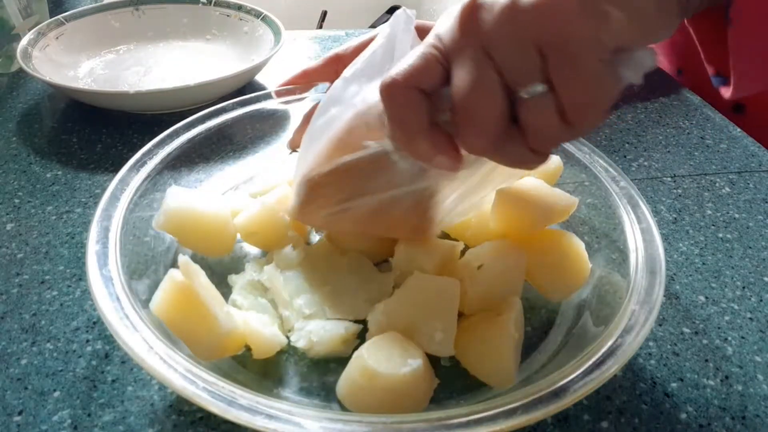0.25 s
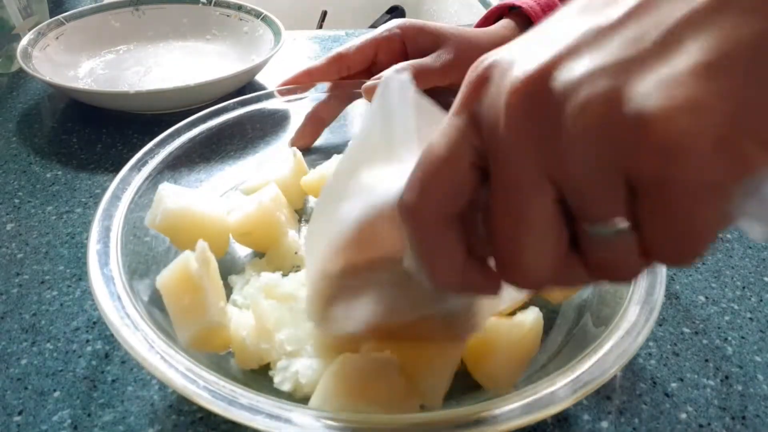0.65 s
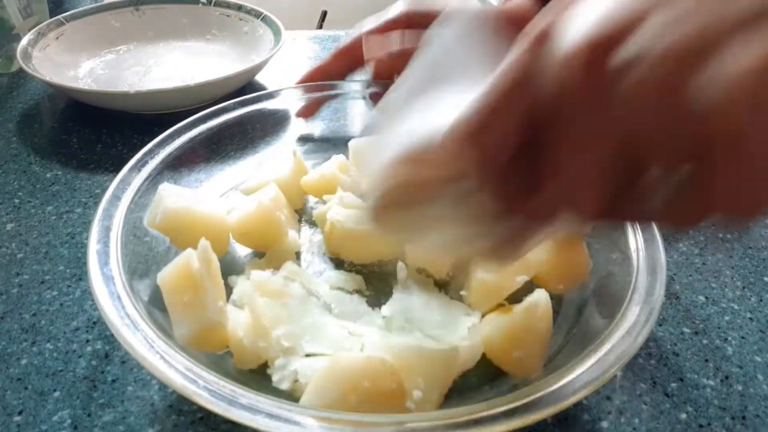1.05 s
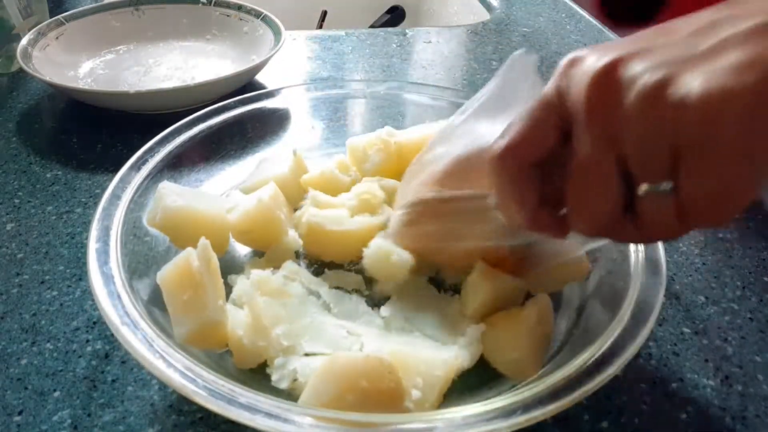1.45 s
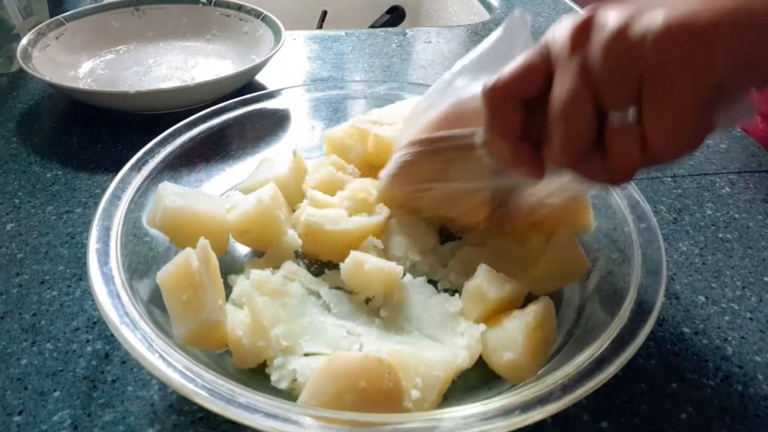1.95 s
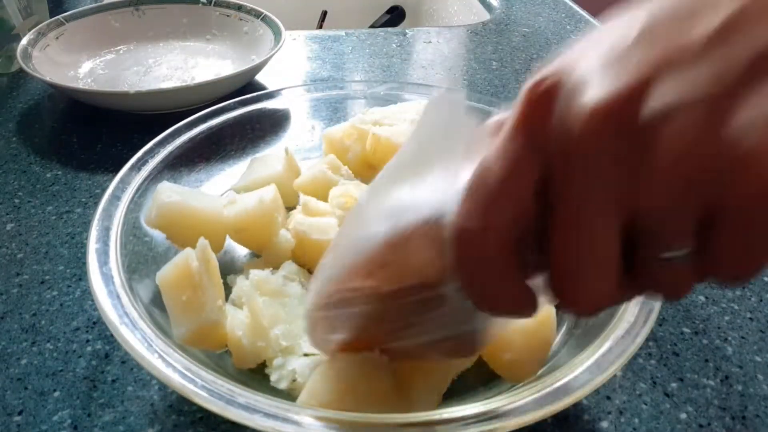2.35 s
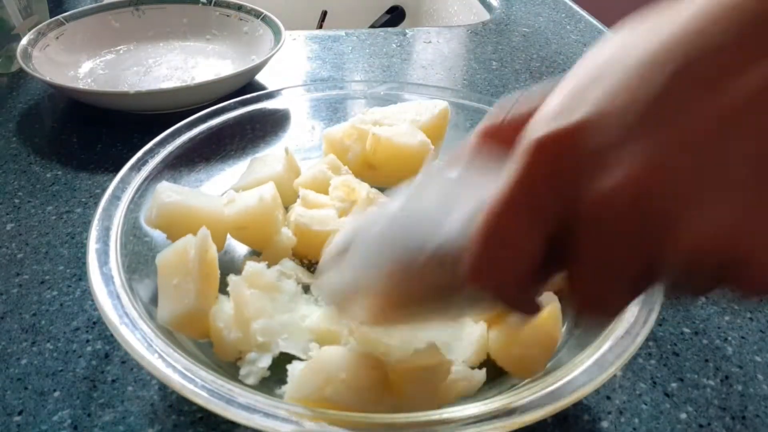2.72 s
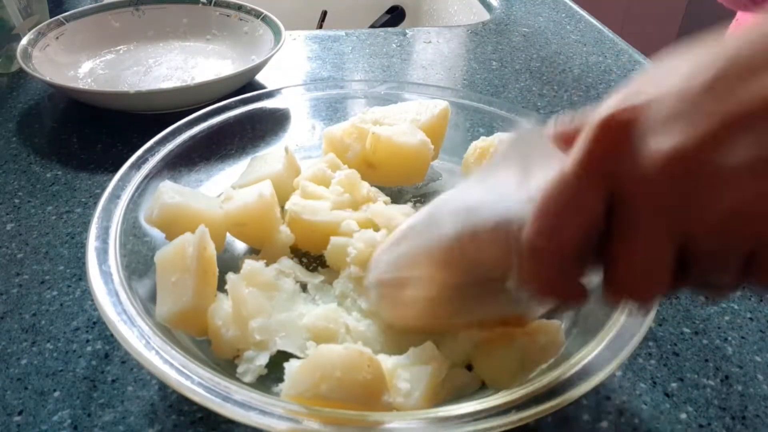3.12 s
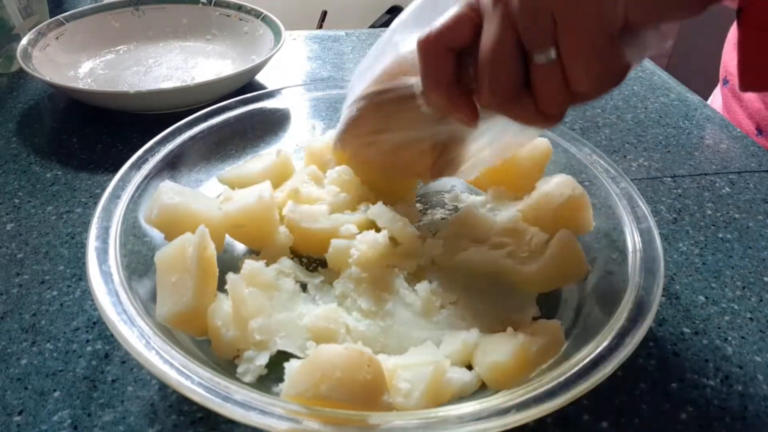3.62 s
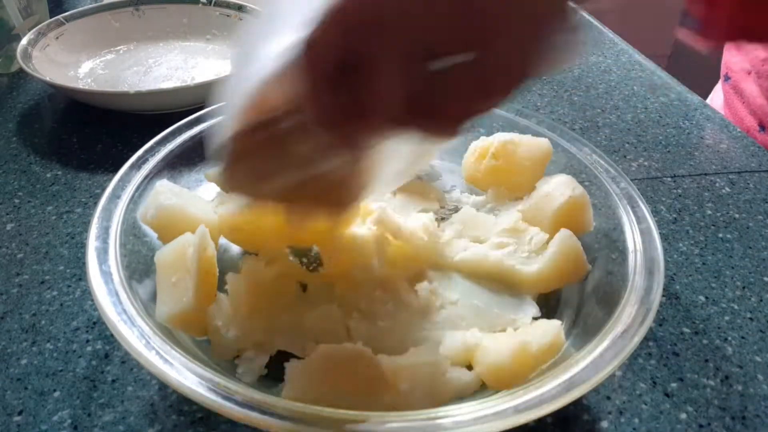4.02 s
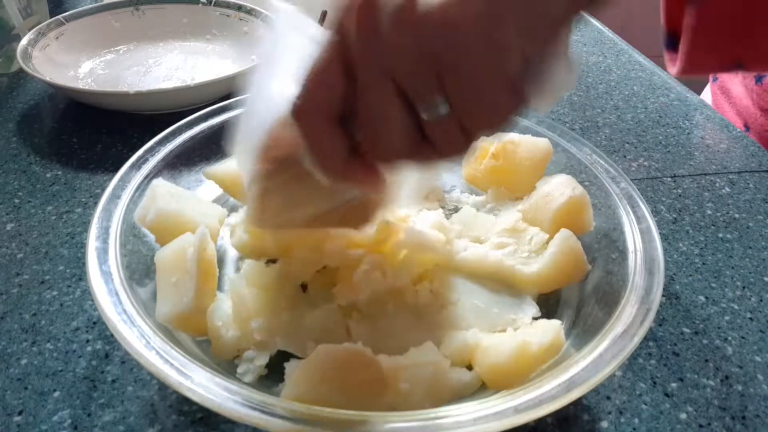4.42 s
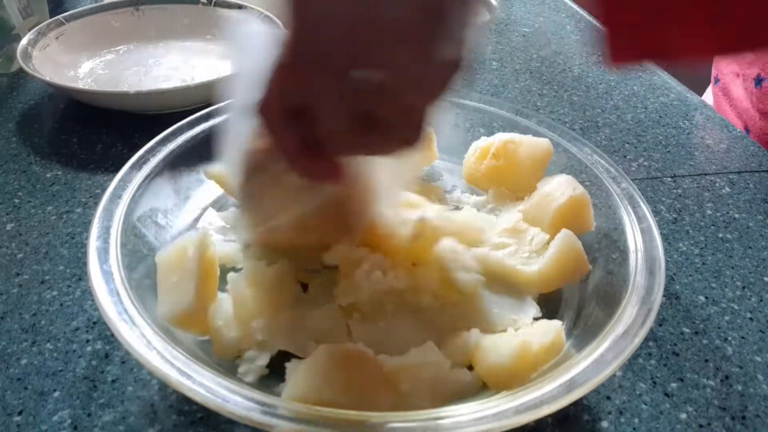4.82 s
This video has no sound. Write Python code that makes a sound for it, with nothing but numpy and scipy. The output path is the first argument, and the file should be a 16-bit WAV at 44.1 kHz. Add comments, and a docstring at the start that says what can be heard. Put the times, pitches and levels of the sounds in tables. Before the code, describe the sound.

Uneven dull glass clacks on a stone counter punctuate rustling plastic rubs and soft potato squashes, over a faint low rumble.

```python
"""A pestle wrapped in a thin plastic bag mashes boiled potatoes in a glass bowl on a stone counter.
Where it breaks through, a force pulse rings the bowl's modes and the bowl clacks on the counter, with an early echo.
The counter thuds under each blow, and a small kitchen answers the clacks as decaying bands of noise.
Strokes and slips are shaped noise: the wrapping swishes and crinkles, the potato squashes more softly and lower.
A low rumble with wavering hum lines lies beneath."""
import sys
import numpy as np
from scipy import signal
from scipy.fft import rfft, irfft, next_fast_len
from scipy.io import wavfile

SR = 44100
rng = np.random.default_rng(int(sys.argv[2]) if len(sys.argv) > 2 else 0)


def store_wav(level_fs):
    """Save 16-bit WAV to argv[1]."""
    pcm = np.round(np.clip(np.atleast_2d(level_fs), -1, 1) * 32767)
    wavfile.write(sys.argv[1], SR, pcm.T.astype(np.int16))


N = 223221
TIME = np.arange(N) / SR


def from_db(db):
    """Level to amplitude ratio: 20 dB is a factor of ten."""
    return 10 ** (np.asarray(db) / 20)


def rms_one(x):
    """Normalization to unit rms."""
    return x / np.sqrt(np.mean(x ** 2) + 1e-20)


def at_hz(points, hz):
    """Linear interpolation of a table along a logarithmic frequency axis."""
    table_hz, value = np.transpose(points)
    return np.interp(np.log(hz + 1e-6), np.log(table_hz), value)


def drift(rate):
    """Random modulation of unit rms: straight lines between `rate` chance values a second."""
    knots = rng.standard_normal(4096)
    return rms_one(np.interp(TIME * rate, np.arange(len(knots)), knots))


# Likeness of the two channels: (frequency [Hz], correlation [0-1])
LIKENESS = [(100, .995), (200, .88), (400, .68), (750, .42), (1250, .08), (3000, 0)]


def stereo_noise(spectrum, size=N):
    """Partial coherence: coloured noise of unit rms, alike in the bass and unrelated in the treble."""
    n = next_fast_len(size)
    hz = np.fft.rfftfreq(n, 1 / SR)
    alike = np.clip(at_hz(LIKENESS, hz), -1, 1)
    mid, side = rfft(rng.standard_normal((2, n)))
    pair = np.sqrt(1 + alike) * mid + np.sqrt(1 - alike) * side * [[1], [-1]]
    coloured = pair * from_db(at_hz(spectrum, hz))
    return rms_one(irfft(coloured, n)[:, :size])


def add(out, sound, s):
    """Superposition: mix a sound in at time s."""
    i = max(round(s * SR), 0)
    out[..., i:i + sound.shape[-1]] += sound[..., :N - i]


def jolts(rows, fade_db_per_s, rise_s=.004):
    """Exponential decay: an envelope that rises quickly to each row's level [dB] at its time [s], then fades."""
    envelope = 0
    for s, db, *_ in rows:
        age = TIME - s
        rise = np.clip(age / rise_s, 0, 1)
        envelope = envelope + rise * from_db(db - fade_db_per_s * np.maximum(age, 0))
    return envelope


# Spectrum of the kitchen rumble: (frequency [Hz], relative density [dB per Hz])
RUMBLE = [(20, -11), (33, -19), (48, -9.5), (60, -12.5), (76, 0), (112, 1.5), (155, -12.5), (190, -10.5),
          (245, -20.5), (320, -8.5), (520, -21.5), (1100, -24), (2200, -34.5), (9000, -46)]
# Steady hum lines: (frequency [Hz], level before wavering [dB])
HUM = [(49.5, -59.5), (75, -59), (99, -66.5)]
# Swell of a deep drone: (time [s], level before wavering [dB])
DRONE = [(1.85, -63), (2.05, -50), (2.7, -45), (2.95, -62)]


def background(rumble_db=-45, drone_hz=68, waver_db=3.5, waver_rate=4, wander_rad=0.68):
    """Narrowband modulation: hum lines waver in level and phase within a stationary rumble."""
    drone_s, drone_db = np.transpose(DRONE)
    lines = HUM + [(drone_hz, np.interp(TIME, drone_s, drone_db))]
    hum = 0
    for hz, db in lines:
        gain = from_db(db + waver_db * drift(waver_rate))
        phase = 2 * np.pi * hz * TIME + wander_rad * drift(waver_rate)
        hum = hum + gain * np.sqrt(2) * np.sin(phase)
    return hum + from_db(rumble_db) * stereo_noise(RUMBLE)


# Kitchen reverberation: (frequency [Hz], t60 [s])
KITCHEN = [(150, 0.16), (500, 0.22), (1200, 0.31), (2500, 0.25), (6000, 0.16)]


def kitchen(x, gap_s=.006):
    """Statistical reverberation: dense reflections start after a short gap and die band by band."""
    t = np.arange(SR // 2) / SR
    hz = np.fft.rfftfreq(len(t), 1 / SR)
    centres = np.transpose(KITCHEN)[0]
    noise = rfft(stereo_noise([(100, 0), (10000, 0)], size=len(t)))
    tail = 0
    # each band takes a triangular share of the spectrum around its centre
    for share, (_, t60) in zip(np.eye(len(centres)), KITCHEN):
        band = irfft(noise * at_hz(np.c_[centres, share], hz), len(t))
        tail = tail + band * from_db(-60 * t / t60)
    tail = rms_one(tail * (t > gap_s)) / np.sqrt(len(t))  # unit energy
    return signal.fftconvolve(x, tail, axes=1)[:, :N]


# Short slips of the wrapping: (peak time [s], level [dB], length of the exponential fade [s])
SLIPS = [(1.018, -33, 0.019), (1.171, -44.5, 0.043), (1.72, -49, 0.025), (3.29, -52, .01),
         (3.34, -46.5, 0.045), (3.739, -39.5, 0.01), (4.071, -52.5, 0.06), (4.906, -46, .009),
         (4.963, -38, .008)]
# Spectrum of a slip: (frequency [Hz], relative density [dB per Hz])
SLIP = [(800, -25), (1900, -5), (2600, 0), (3800, -2.5), (6000, -9), (8200, -8), (9000, 2), (15000, -9)]


def slips(rise_s=0.0042):
    """Stick-slip friction: the wrapping lets go at once and slides to rest."""
    level = 0
    for s, db, length in SLIPS:
        rise = np.clip((TIME - s) / rise_s + 1, 0, 1)
        level = level + from_db(db) * rise * np.exp(-np.abs(TIME - s) / length)
    return level * stereo_noise(SLIP)


def crinkles(per_s=220, size_db=3.2, snap_t60=.006):
    """Random impulse process: tiny snaps of the plastic, many small and a few large; unit rms."""
    sizes = from_db(size_db * np.minimum(rng.exponential(1, N), 4))
    snaps = sizes * (rng.random(N) < per_s / SR)
    decay_per_sample = from_db(-60 / (snap_t60 * SR))
    return rms_one(signal.lfilter([1], [1, -decay_per_sample], snaps + 1e-18))


def stroke_shape(start, length, build_db, attack_s=0.029, release_db_per_s=232):
    """Friction grows with pressure: a stroke takes hold, builds up to its end, then dies away."""
    age = TIME - start
    attack = np.clip(age / attack_s, 0, 1)
    still_to_build_db = build_db * np.clip(1 - age / length, 0, 1)
    released_db = release_db_per_s * np.maximum(age - length, 0)
    return attack * from_db(-still_to_build_db - released_db)


# Strokes of the pestle: (start [s], length [s], final swish before texture [dB], build-up [dB],
# final squash before texture [dB])
STROKES = [(-0.03, 0.071, -56.5, 0.5, -50), (0.044, 0.18, -41.5, 10, -47.5),
           (0.235, 0.12, -36.5, 12.5, -45), (0.39, 0.12, -40, 7.5, -46), (0.63, .07, -54.5, 11, -62),
           (0.742, 0.12, -38, 19.5, -58), (0.935, 0.07, -39, 20, -62), (1.157, 0.31, -45, 12, -73.5),
           (1.525, 0.092, -40, 9.5, -53), (1.697, 0.22, -48.5, 6, -56), (1.852, 0.21, -42, 3.5, -47),
           (2.085, 0.095, -37, 7, -42), (2.263, .08, -58.5, -1.5, -54), (2.357, 0.27, -41.5, 7, -48),
           (2.652, 0.072, -35, 8.5, -41.5), (2.804, 0.057, -51.5, 3, -63), (2.892, .2, -40.5, 7.5, -49),
           (3.115, 0.047, -37.5, 8, -46), (3.413, 0.24, -51.5, 2, -73), (3.658, 0.12, -47, 2.5, -55),
           (3.817, 0.099, -42.5, 9.5, -61), (4.11, 0.19, -46, 13, -60), (4.321, 0.13, -41, 16.5, -49),
           (4.528, .11, -67, 0, -53), (4.644, 0.26, -53, 4, -52.5), (4.884, 0.12, -39.5, 8, -47.5)]
# A lump of potato gives way all at once: (time [s], squash level before texture [dB])
BURSTS = [(0.321, -35), (0.369, -24), (2.71, -35.5), (3.172, -20)]


def rubbing(resting_swish_db=-63, resting_squash_db=-60, burst_fade_db_per_s=341):
    """Incoherent power addition: strokes, bursts and the restless contact between strokes, as two gains."""
    # between strokes the hand still shifts on the wrapping and the pestle settles in the mash
    swish_power = from_db(resting_swish_db) ** 2
    squash_power = from_db(resting_squash_db) ** 2 + jolts(BURSTS, burst_fade_db_per_s) ** 2
    for start, length, swish_db, build_db, squash_db in STROKES:
        shape = stroke_shape(start, length, build_db)
        swish_power = swish_power + (from_db(swish_db) * shape) ** 2
        squash_power = squash_power + (from_db(squash_db) * shape) ** 2
    return np.sqrt(swish_power), np.sqrt(squash_power)


# Spectrum of the sliding plastic: (frequency [Hz], relative density [dB per Hz])
SWISH = [(300, -7.5), (1500, -7), (3000, -4), (5000, -5), (8200, -8.5), (8900, 2), (10500, -2), (15500, -4)]
# Spectrum of the yielding potato: (frequency [Hz], relative density [dB per Hz])
SQUASH = [(120, -7), (330, 13.5), (600, -0.5), (1000, -0.5), (2000, -9.5), (3000, -8.5), (5000, -25.5),
          (9000, -61)]


def strokes(swish_db=2.0, crinkle_db=-4, flutter_db=1.4, flutter_rate=70, crumble_db=2.0, crumble_rate=60):
    """Friction noise: plastic slides with a fine hiss and crinkles; potato gives a softer, lower rub."""
    swish, squash = rubbing()
    hiss = from_db(swish_db + flutter_db * drift(flutter_rate))
    grain = np.hypot(hiss, from_db(crinkle_db) * crinkles())
    wrapping = swish * grain * stereo_noise(SWISH)
    crumble = from_db(crumble_db * drift(crumble_rate))
    potato = squash * crumble * stereo_noise(SQUASH)
    return wrapping + potato


# Spectrum of the counter's dull thud: (frequency [Hz], relative density [dB per Hz])
THUD = [(25, -28), (55, -14.5), (88, 13), (130, -11.5), (250, -28), (1000, -70)]


def thuds(thud_db=-35, fade_db_per_s=90):
    """Damped structural response: each blow shakes the counter, which booms briefly."""
    return from_db(thud_db) * jolts(KNOCKS, fade_db_per_s) * stereo_noise(THUD)


def contact(t, corner_hz, roundness):
    """Contact-time filtering: more potato under the pestle makes a longer, duller pulse; samples sum to 1."""
    power = max(roundness, 1)
    # a rounder pulse keeps its width but loses its treble more steeply
    age = 2 * np.pi * corner_hz * np.sqrt((power + 1) / 3) * t
    force = age ** power * np.exp(-age)
    return force / force.sum()


# Dead jolt of the bowl's base on the counter, before the contact pulse smooths it:
# (frequency [Hz], level struck at the centre [dB], level struck at the wall [dB], rise [s])
JOLT = [(508, -8.5, -31, 0.001), (963, -2, -5.5, 0.00092), (2104, -3.5, 3.5, 0.00032),
        (3130, 5, -3, 0.00017)]


def base_jolt(t, place):
    """Heavily damped oscillation: the base swings up and dies at once, coloured by the place struck."""
    jolt = 0
    for hz, centre_db, wall_db, rise in JOLT:
        envelope = t / rise * np.exp(1 - t / rise)
        gain = from_db(centre_db + place * (wall_db - centre_db))
        jolt = jolt + gain * envelope * np.sin(2 * np.pi * hz * t)
    return jolt


# Pestle blows: (time [s], strength [dB], contact corner at roundness 2 [Hz],
# contact roundness [exponent, higher is smoother], place [0 centre - 1 wall], echo re direct sound [dB])
KNOCKS = [(0.3205, -10, 300, 15, 0.55, 7.5), (0.3685, 0.1, 2610, 11, 1, -5),
          (0.718, -23, 1490, 4.5, 0, -0.5), (0.963, -20, 1460, 2.1, 0.047, 1),
          (1.5956, -13, 1870, 2.7, 0.12, -5), (1.9189, -9.5, 1680, 1.56, 0, 1),
          (2.4014, -20.5, 1110, 3.7, 0.12, 2.5), (2.7099, -10.5, 1580, 2, 0.2, -8),
          (2.8965, -11, 1790, 2.1, 0.077, -3), (3.1709, -5.5, 2530, 1.3, 0.42, -3.5)]
# Modes of the bowl as it rings on the counter, before scatter:
# (frequency [Hz], level struck at the centre [dB], level struck at the wall [dB], t60 [s])
BOWL = [(197, -30, -31, .14), (231, -29, -25, .14), (338, -19, -22, .21), (455, -18, -32, .1),
        (482, -13, -30, .12), (528, -23, -26, .1), (551, -23, -18, .15), (628, -19, -20, .14),
        (750, -24, -20, .13), (850, -18, -21, .08), (968, -18, -18, .09), (1003, -11, -23, .12),
        (1050, -16, -20, .09), (1165, -17, -20, .12), (1365, -18, -24, .11), (1500, -19, -20, .14),
        (1647, -17, -17, .17), (1761, -24, -18, .15), (1951, -15, -17, .14), (2299, -22, -16, .15),
        (2392, -20, -14, .16), (2712, -15, -15, .26), (3970, -17, -21, .22)]
# Spectrum of the dull clack of glass on stone: (frequency [Hz], relative density [dB per Hz])
CLACK = [(60, -24), (200, -15.5), (400, -1), (800, 2.5), (1300, -6), (2000, 1), (2700, 1.5), (3050, -1),
         (3900, -1), (5000, 0), (12000, -10.5)]


def knocks(clack_db=-5, clack_t60=0.031, wet_db=2, scatter_db=2.74, echo_s=0.0041):
    """Modal excitation by impact: each blow rings the bowl; its jolt and clack echo off the counter or wall."""
    body, clacks = np.zeros((2, 2, N))
    t = np.arange(SR // 3) / SR
    hz, centre_db, wall_db, t60 = np.transpose(BOWL)[:, :, None]
    # higher modes reach the two microphones further out of phase
    apart = np.arccos(np.clip(at_hz(LIKENESS, hz), -1, 1)) / 2
    # neighbouring modes swing opposite ways
    phase = np.pi * (np.arange(len(hz))[:, None] + 1) + np.array([apart, -apart])
    modes = np.sin(2 * np.pi * hz * t + phase) * from_db(-60 * t / t60)
    for s, db, corner_hz, roundness, place, echo_db in KNOCKS:
        force = from_db(db) * contact(t, corner_hz, roundness)[None]
        scatter = scatter_db * rng.standard_normal(hz.shape)
        mode_db = centre_db + place * (wall_db - centre_db) + scatter
        ring = (from_db(mode_db) * modes).sum(axis=1)
        add(body, signal.fftconvolve(ring, force, axes=1), s)
        jolt = signal.fftconvolve(base_jolt(t, place), force[0])
        # direct sound, then the early echo
        for when, path_db in [(s, 0), (s + echo_s, echo_db)]:
            clack_gain = from_db(clack_db + path_db - 60 * t / clack_t60)
            clack = clack_gain * stereo_noise(CLACK, size=len(t))
            add(clacks, signal.fftconvolve(clack, force, axes=1), when)
            add(body, from_db(path_db) * jolt, when)
    return body + clacks + from_db(wet_db) * kitchen(clacks)


def scene():
    """Linear superposition: the background, the rubbing, and the knocks in their room."""
    return background() + slips() + strokes() + thuds() + knocks()


# Balance of the microphones: (frequency [Hz], left minus right [dB])
BALANCE = [(100, 2), (250, 2), (700, 1), (4000, 1), (8500, 4), (15000, 3.5)]


def record(dry, low_cut_hz=40, top_cut_hz=15550, ceiling=.96):
    """Band limiting and soft saturation: left is a little louder, high peaks are rounded, both ends cut."""
    n = next_fast_len(N + SR // 10)
    lean_db = at_hz(BALANCE, np.fft.rfftfreq(n, 1 / SR)) / 2
    heard = irfft(rfft(dry, n) * from_db([lean_db, -lean_db]), n)[:, :N]
    low_cut = signal.butter(2, low_cut_hz, "high", fs=SR, output="sos")
    heard = signal.sosfilt(low_cut, heard)
    rounded = heard / (1 + (heard / ceiling) ** 6) ** (1 / 6)
    top_cut = signal.ellip(12, .1, 80, top_cut_hz, fs=SR, output="sos")
    return signal.sosfilt(top_cut, rounded)


dry = scene()
out = record(dry)
store_wav(out)
```